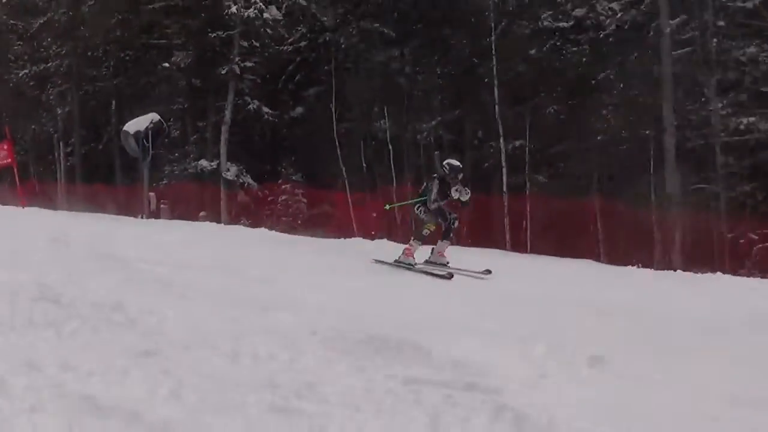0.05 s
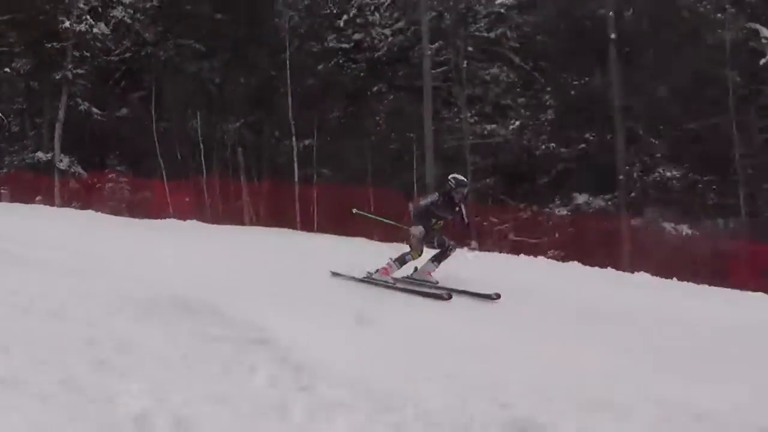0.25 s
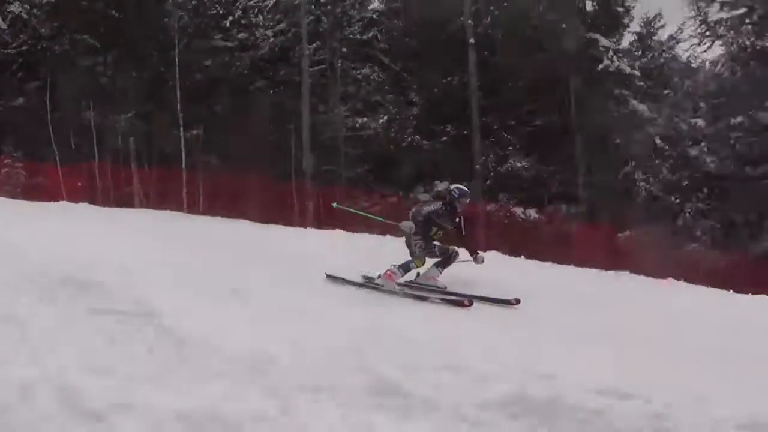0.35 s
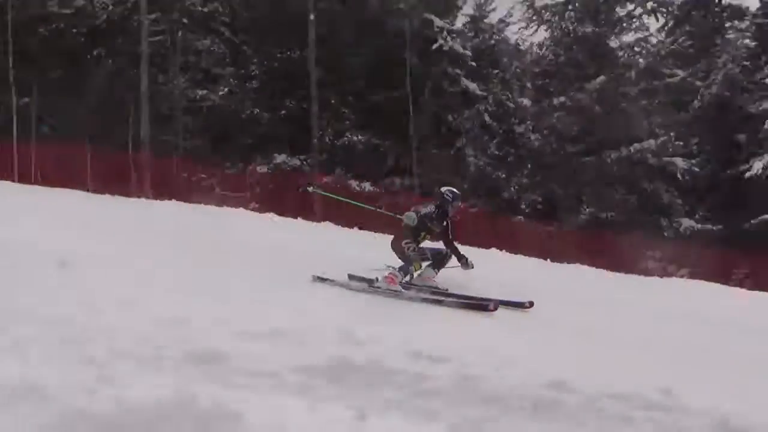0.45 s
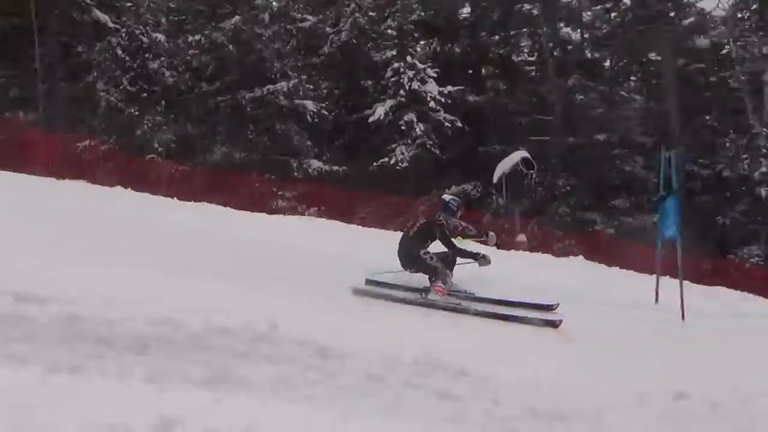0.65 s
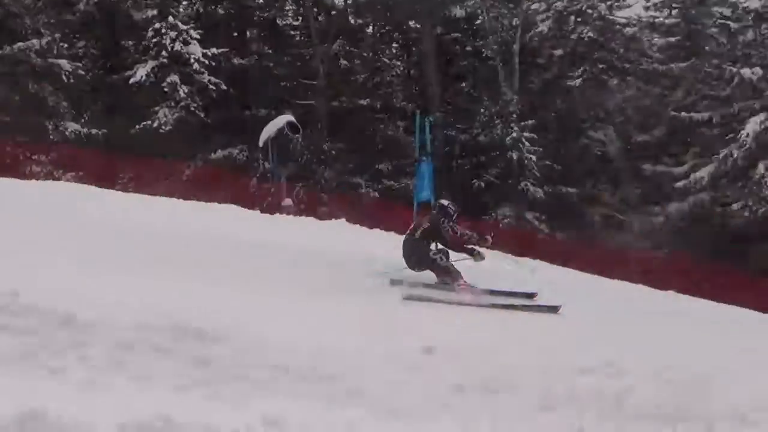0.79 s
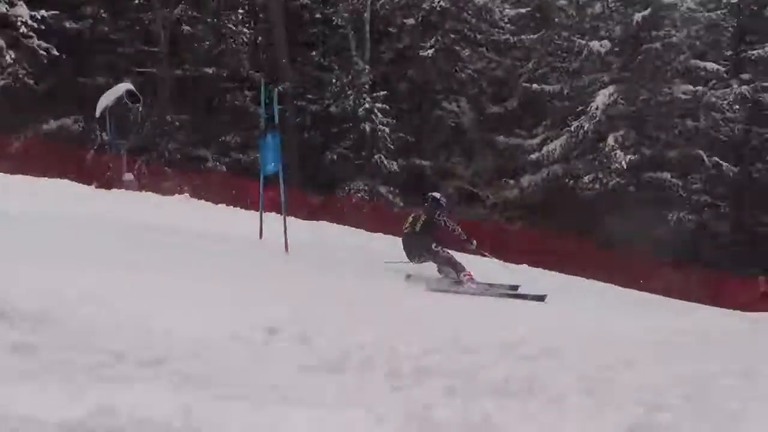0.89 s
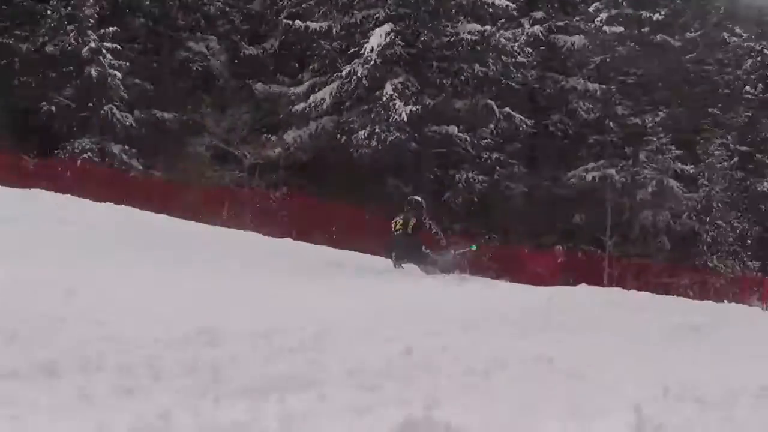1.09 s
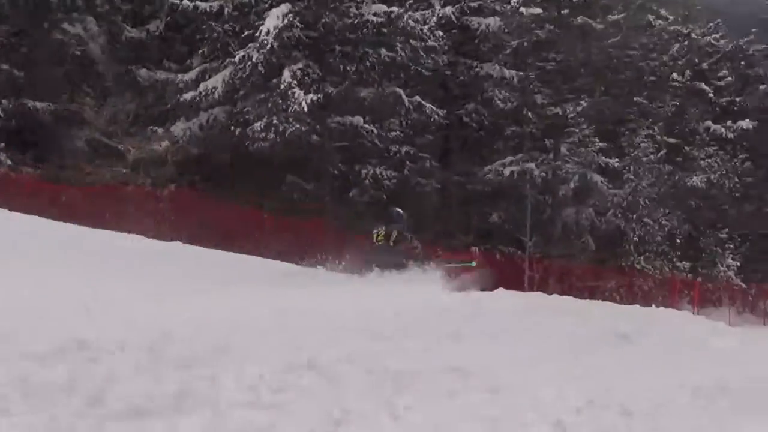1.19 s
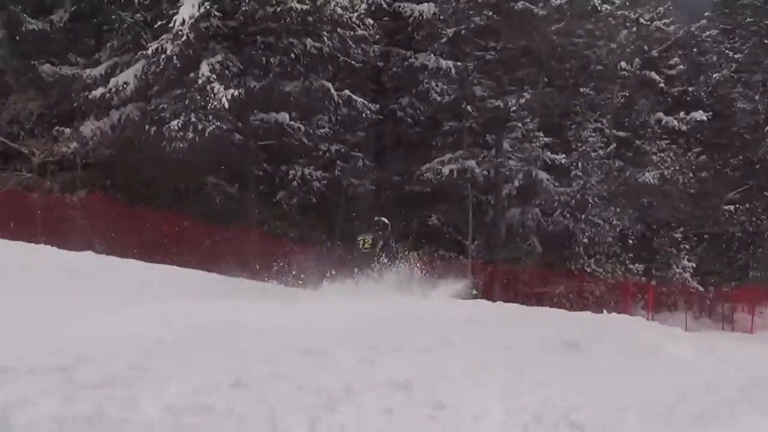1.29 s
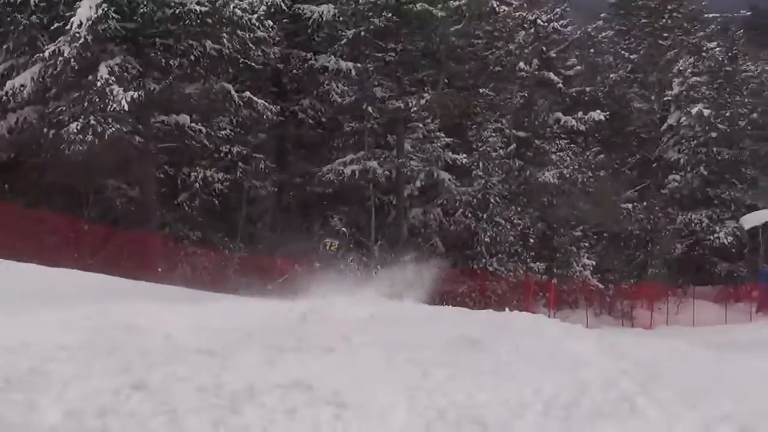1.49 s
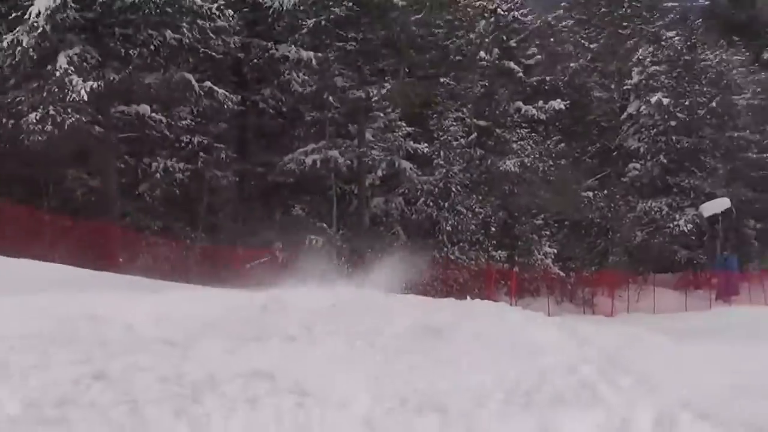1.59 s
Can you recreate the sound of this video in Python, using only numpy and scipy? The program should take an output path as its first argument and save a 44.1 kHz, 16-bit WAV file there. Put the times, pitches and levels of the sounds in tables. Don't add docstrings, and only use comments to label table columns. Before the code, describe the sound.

Steel ski edges bite suddenly into hard packed snow close to the microphone, a coarse scrape and bright icy hiss that chatters and slaps, then thins into scattered crumbs on a quiet open slope.

```python
import sys
import numpy as np
from scipy import signal
from scipy.io import wavfile

SR = 44100
rng = np.random.default_rng(int(sys.argv[2]) if len(sys.argv) > 2 else 0)


def dump_mix(stems):
    frames = np.atleast_2d(stems).T
    limited = np.clip(frames, -1, 1)
    pcm = np.round(limited * 32767).astype(np.int16)
    wavfile.write(sys.argv[1], SR, pcm)


def gain_from_decibels(decibels):
    exponent = np.asarray(decibels, float) / 20
    return 10 ** exponent


N = 72765

# time [s], scrape level [dB], spray level [dB], grain pitch [Hz].
EDGE_LOAD = [(0, -51.5, -54.5, 2410), (.172, -49, -49.5, 3000), (.208, -34.5, -30.5, 3020),
             (.27, -26, -23, 3130), (.4, -21, -26, 3500), (.47, -18.5, -15.5, 3150),
             (.54, -21.5, -15, 5350), (.62, -21, -15.5, 5970), (.68, -25, -13.5, 5100),
             (.78, -19, -20.5, 4170), (.86, -16.5, -24, 5140), (.91, -26, -29.5, 3200),
             (1.02, -25, -27, 3260), (1.11, -27, -31, 2570), (1.23, -34.5, -42, 2140),
             (1.365, -41.5, -32.5, 2520), (1.42, -45, -42, 2580), (1.465, -50, -58, 2520)]


def rms_one(x):
    return x / np.sqrt(np.mean(x ** 2) + 1e-20)


def in_time(rows):
    times_s, *columns = np.transpose(rows)
    return [np.interp(np.arange(N) / SR, times_s, column) for column in columns]


def at_hz(points, hz):
    table_hz, values = np.array(points)[:, 0], np.array(points)[:, 1]
    return np.interp(np.log(hz), np.log(table_hz), values)


def drift(rate_hz):
    step = 20
    r = np.exp(-2 * np.pi * rate_hz * step / SR)
    noise = rng.standard_normal(N // step + 2002)
    slow = signal.lfilter([1], [1, -2 * r, r * r], noise)[2000:]
    return np.interp(np.arange(N) / step, np.arange(len(slow)), 2 * np.tanh(rms_one(slow) / 2))


def window(start_s, length_s, rise_s, fall_s):
    t = np.arange(N) / SR - start_s
    return np.clip(t / rise_s, 0, 1) * np.exp(-np.clip(t - length_s, 0, None) / fall_s)


def bandpass(x, low_hz, high_hz, order=2):
    return signal.sosfilt(signal.butter(order, [low_hz, high_hz], "band", fs=SR, output="sos"), x)


def highpass(x, hz):
    return signal.sosfilt(signal.butter(2, hz, "high", fs=SR, output="sos"), x)


def grains(per_s, spread_db):
    shape = (2, 2, N)
    sizes = gain_from_decibels(spread_db * np.minimum(rng.exponential(1, shape), 3.5))
    sizes = sizes * np.clip(rng.standard_normal(shape), -2, 2)
    return rms_one(sizes * (rng.random(shape) < per_s / SR))


def banded(source, colour_db, shared_db, own_db, own_rate_hz):
    # frequency [Hz], likeness [0-1].
    likeness = [(40, 1), (150, 1), (300, 0.82), (600, 0.83), (1200, 0.93), (2500, 0.91), (5000, 0.87),
                (9000, 0.96)]
    # frequency [Hz], left minus right [dB].
    tilt = [(60, 1.5), (220, -1), (830, -1.5), (3100, 0.5), (11600, -1.0)]
    out, together = 0, drift(45)
    edges_hz = 28 * 2 ** np.arange(0, 9.1, 0.5)
    for k, (low_hz, high_hz) in enumerate(zip(edges_hz, edges_hz[1:])):
        mid, side = bandpass(source[k % 2], low_hz, high_hz)
        hz = np.sqrt(low_hz * high_hz)
        alike = np.clip(at_hz(likeness, hz), 0, 1)
        lean_db = at_hz(tilt, hz) / 2
        gain = gain_from_decibels(colour_db(hz) + shared_db * together + own_db * drift(own_rate_hz))
        stereo = np.sqrt(1 + alike) * mid + np.sqrt(1 - alike) * side * [[1], [-1]]
        out = out + gain * stereo * gain_from_decibels([[lean_db], [-lean_db]])
    return rms_one(out)


def open_air():
    # frequency [Hz], density [dB per Hz].
    air_colour = [(18, -28), (40, -12), (120, -9), (763, -13), (1050, -15.5), (1450, -16.5), (1810, -11),
                  (2380, -24.5), (11000, -28.5), (14300, -66), (22000, -120)]
    level_db, fade_db_per_s = -48.5, 2.5
    noise = rng.standard_normal((2, 2, N))
    air = banded(noise, lambda hz: at_hz(air_colour, hz), shared_db=1.1, own_db=1.5, own_rate_hz=15)
    return gain_from_decibels(level_db - fade_db_per_s * np.arange(N) / SR) * air


def wind():
    # time [s], level [dB].
    gusts = [
        (0, -45.5),
        (.14, -54),
        (.27, -53),
        (.42, -43.5),
        (.6, -55),
        (.8, -71),
        (1.1, -69),
        (1.3, -59),
        (1.65, -72),
    ]
    low = bandpass(rng.standard_normal((3, N)), 38, 124)
    level_db = in_time(gusts)[0] + [[-0.8], [0.8]] + 2.5 * drift(6)
    return gain_from_decibels(level_db) * rms_one(low[0] + 0.8 * low[1:])


def edge_chatter():
    # start [s], scrape change [dB], spray change [dB], length [s].
    chatter = [(0.177, -5, 14, 0.0041), (0.187, -7, 14.5, 0.005), (0.2105, 6.5, 2.5, 0.0051),
               (0.28, 1.5, 3, 0.0039), (0.302, 4, 6, 0.0084), (0.306, -2, -4, 0.031),
               (0.341, 3, 11, 0.0033), (0.351, -3, -4, 0.009), (0.368, 4.5, 7, 0.0063),
               (0.385, -5, -4, 0.02), (0.4004, 4, 9.5, 0.015), (0.413, 0.5, -7, .007),
               (0.444, 1, -4, 0.0089), (0.458, 0.5, -3, .003), (0.475, -4.5, 1.5, 0.01),
               (.532, -9, -1, 0.0056), (0.534, -4.5, 4.5, .008), (0.547, -0.5, -3, .005),
               (0.576, -1, -5.5, 0.0091), (0.59, 3.5, -1, 0.01), (0.622, 1.5, 2, 0.026),
               (0.64, -3, -6, 0.0026), (0.646, -2.5, 0, 0.017), (0.701, -6, -1, .005),
               (.708, 2.5, 1, 0.013), (.728, 1, 0, 0.0026), (0.794, 0.5, 4, 0.031), (0.831, -4.5, 2, 0.014),
               (0.841, -0.5, 6, 0.0085), (0.898, 1, 10, 0.008), (0.918, 1, 10, 0.0069),
               (0.933, 2.5, 9.5, 0.0079), (0.95, -9, -16, 0.012), (0.961, -3, 13, 0.0078),
               (0.975, -9, -14, 0.012), (0.987, -8, 8, 0.003), (0.991, -7, -8, 0.0058),
               (0.998, -1.5, 7, .006), (1.01, 0.5, 2.5, 0.0096), (1.027, -5, -6, .004),
               (1.031, 3.5, 6, 0.014), (1.059, -2, -18, 0.0045), (1.068, 0.5, 5.5, 0.0062),
               (1.137, 0.5, 4.5, 0.027), (1.163, 0, -5, .008), (1.18, 6, -2, 0.0052),
               (1.196, -1.5, -5, 0.0085), (1.203, 2.5, 9.5, 0.011), (1.247, -9, 12.5, 0.0055)]
    set_in_s, settle_s = 0.0019, 0.0012
    return sum(np.outer([scrape_db, spray_db], window(start_s, length_s, set_in_s, settle_s))
               for start_s, scrape_db, spray_db, length_s in chatter)


def edges_on_snow(scrape_bite_db, spray_bite_db):
    # frequency [Hz], density [dB per Hz].
    bed = [(40, -42), (90, -19), (250, -13.5), (600, -6.5), (1000, -5), (2000, -9.5), (6000, -13),
           (11000, -9.5)]
    # frequency [Hz], density [dB per Hz].
    spray_colour = [(40, -75), (600, -7), (1500, -13), (4000, -7.5), (7000, -3), (10500, 6)]
    hump_db, hump_octaves = 9, 1
    scrape_db, spray_db, grain_hz = in_time(EDGE_LOAD)

    def scrape_colour_db(hz):
        return at_hz(bed, hz) + hump_db * np.exp(-(np.log2(hz / grain_hz) / hump_octaves) ** 2)

    scrape = banded(grains(14000, 2.17), scrape_colour_db, shared_db=0.3, own_db=1.72, own_rate_hz=21)
    spray = banded(grains(22000, 3.0), lambda hz: at_hz(spray_colour, hz),
                   shared_db=0.4, own_db=1.5, own_rate_hz=14)
    return gain_from_decibels(scrape_db + scrape_bite_db) * scrape + gain_from_decibels(spray_db + spray_bite_db) * spray


def skis(chatter_db):
    # frequency [Hz], level [dB], decay by 60 dB [s].
    modes = [(94, -17, 0.1), (166, -5.5, 0.051), (346, -22, 0.024), (528, 3, 0.022), (650, 1.5, 0.055),
             (914, -6, 0.015)]
    # time [s], level [dB].
    slaps = [
        (.376, -36),
        (0.407, -36),
        (.452, -41),
        (.6, -35),
        (.735, -28),
        (.812, -51),
        (.846, -46),
        (.856, -28),
        (0.869, -35.5),
        (1.042, -44),
    ]
    drum_db, drum_follows_load, rub_apart, slap_cut_hz = -11.5, 0.69, 1.5, 300
    load_db = in_time(EDGE_LOAD)[0]
    rub_level = gain_from_decibels(drum_db - 34 + drum_follows_load * (load_db + chatter_db + 21))
    out = 0
    for hz, db, t60_s in modes:
        r, w = gain_from_decibels(-60 / (t60_s * SR)), 2 * np.pi * hz / SR
        resonance = [1, -2 * r * np.cos(w), r * r]
        rough = rng.standard_normal(N) + rub_apart * 150 / hz * rng.standard_normal((2, N))
        rub = rms_one(signal.lfilter([1], resonance, rough * gain_from_decibels(1.7 * drift(31))))
        hits = np.full(N, 1e-18)
        for (time_s, slap_db), vary_db in zip(slaps, rng.normal(0, 0.85, len(slaps))):
            hits[int(time_s * SR)] = gain_from_decibels(slap_db + vary_db)
        slap = signal.lfilter([0, np.sin(w)], resonance, highpass(hits, slap_cut_hz))
        out = out + gain_from_decibels(db) * (slap + rub * rub_level)
    return out


def crumbs():
    # start [s], level [dB], pitch [Hz], length [s].
    puffs = [(0.102, -40.5, 10400, 0.006), (0.104, -56, 960, 0.004), (0.116, -50, 736, 0.057),
             (0.129, -41.5, 10800, 0.0093), (0.132, -51, 4030, 0.0088), (.426, -23.5, 5500, .018),
             (.458, -31, 4160, 0.01), (.487, -29, 4200, 0.0099), (0.503, -24, 4130, 0.0093),
             (0.767, -26.5, 4600, 0.018), (1.012, -27, 3320, 0.011), (1.027, -26, 3180, 0.013),
             (1.048, -34, 3000, .008), (1.14, -30.5, 1370, .008), (1.152, -44, 2430, 0.0042),
             (1.365, -39, 3200, 0.0055), (1.356, -38.5, 11200, 0.046), (1.428, -40, 10500, 0.024),
             (1.462, -35, 7750, 0.024), (1.482, -42.5, 5570, 0.0093), (1.523, -51.5, 3700, 0.0065),
             (1.522, -45.5, 8200, 0.005), (1.526, -57, 5450, 0.021), (0.562, -37, 565, .06),
             (.848, -31, 647, 0.029), (0.856, -41, 940, 0.019), (0.232, -35, 2070, .04),
             (0.227, -38.5, 5000, 0.087), (.31, -33.5, 5400, .025), (0.216, -38, 3500, 0.0035),
             (0.3406, -23.5, 3200, 0.0094), (.371, -24, 2940, 0.0086), (0.401, -25, 4600, 0.012),
             (1.6147, -41, 8400, 0.0036), (1.637, -40, 8850, 0.0016), (1.639, -47, 4300, 0.0072),
             (1.644, -43.5, 9500, .008)]
    half_width_octaves, rise_s, fall_s = 0.34, 0.00013, 0.0014
    out = 0
    for start_s, db, hz, length_s in puffs:
        low_hz = hz * 2 ** -half_width_octaves
        high_hz = min(hz * 2 ** half_width_octaves, 0.4 * SR)
        mid, side = bandpass(grains(14000, 3.1)[0], low_hz, high_hz, order=3)
        grit = rms_one(mid + 0.24 * side * [[1], [-1]])
        out = out + gain_from_decibels(db) * window(start_s, length_s, rise_s, fall_s) * grit
    return out


def thuds():
    # start [s], level [dB], pitch [Hz].
    pushes = [
        (.12, -45, 40),
        (0.256, -41, 57.7),
        (0.386, -36.5, 84),
        (0.409, -40, 48),
        (.715, -48, 71),
        (0.845, -29.5, 161.7),
        (0.918, -45, 125),
        (1.042, -38, 176),
    ]
    rise_s, fall_cycles = 0.006, 1.8
    t = np.arange(N) / SR
    out = 0
    for start_s, db, hz in pushes:
        push = window(start_s, rise_s, rise_s, fall_cycles / hz) * np.sin(2 * np.pi * hz * (t - start_s))
        out = out + gain_from_decibels(db + np.array([[-2.5], [2.5]])) * push
    return out


def pellets():
    # time [s], peak level [dB], pitch [Hz].
    strikes = [(0.2112, -16, 4000), (.2797, -13, 9000), (.2853, -14, 8500), (.537, -11, 8000),
               (0.6, -12, 5000), (.9245, -14, 5000), (1.0755, -17, 7000), (1.4622, -28, 8500),
               (1.4645, -19, 7500), (1.469, -28, 8500), (1.4752, -24, 8100), (1.484, -24, 7650),
               (1.548, -43, 5000), (1.5641, -31, 1900), (1.5649, -34, 1300), (1.6, -42, 9000),
               (1.6178, -29, 6000), (1.619, -39, 2500)]
    half_width_octaves = 0.5
    out = 0
    for time_s, db, hz in strikes:
        click = np.full(N, 1e-18)
        click[int(time_s * SR)] = 1
        high_hz = min(hz * 2 ** half_width_octaves, 0.4 * SR)
        ping = bandpass(click, hz * 2 ** -half_width_octaves, high_hz)
        out = out + gain_from_decibels(db) * ping / np.abs(ping).max()
    return out


def squeaks():
    # start [s], level [dB], start pitch [Hz], fall [octaves per s], length [s].
    slides = [
        (1.4095, -38, 11000, 72, .012),
        (1.42, -35, 11000, 24, .008),
        (1.429, -35, 11300, 24, .01),
        (1.439, -38, 9600, -26, .005),
        (1.429, -47, 7600, 36, .012),
        (1.421, -52, 5600, 25, .007),
        (1.521, -50, 5000, 90, .005),
    ]
    t = np.arange(N) / SR
    out = 0
    for start_s, db, hz, fall, length_s in slides:
        slide_s = np.clip(t - start_s, 0, 2 * length_s)
        pitch_hz = hz * 2 ** (-fall * slide_s) * (1 + 0.025 * drift(300))
        level_db = db - 250 * np.clip(t - start_s, 0, 1) + 3 * drift(300)
        tone = np.sin(2 * np.pi * np.cumsum(pitch_hz) / SR)
        out = out + gain_from_decibels(level_db) * window(start_s, length_s, 0.0015, 0.001) * tone
    return out


def scene():
    scrape_bite_db, spray_bite_db = edge_chatter()
    background = open_air() + wind()
    snow = edges_on_snow(scrape_bite_db, spray_bite_db) + crumbs() + pellets() + squeaks()
    return background + snow + skis(scrape_bite_db) + thuds()


def low_pass(x):
    return signal.sosfilt(signal.butter(12, 12170, fs=SR, output="sos"), x)


def record(dry):
    rounded = 0.8 * np.tanh(1.4 * dry)
    top_cut = signal.cheby2(28, 60, 11130, fs=SR, output="sos")
    mix = signal.sosfilt(top_cut, highpass(rounded, 40))
    return low_pass(mix)


dry = scene()
out = record(dry)
dump_mix(out)
```